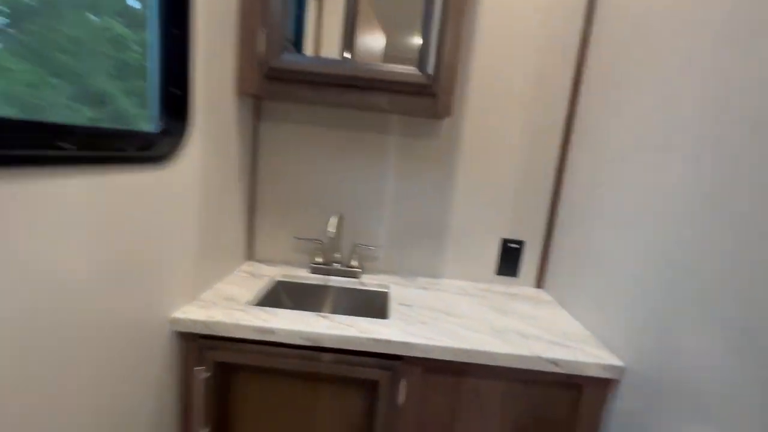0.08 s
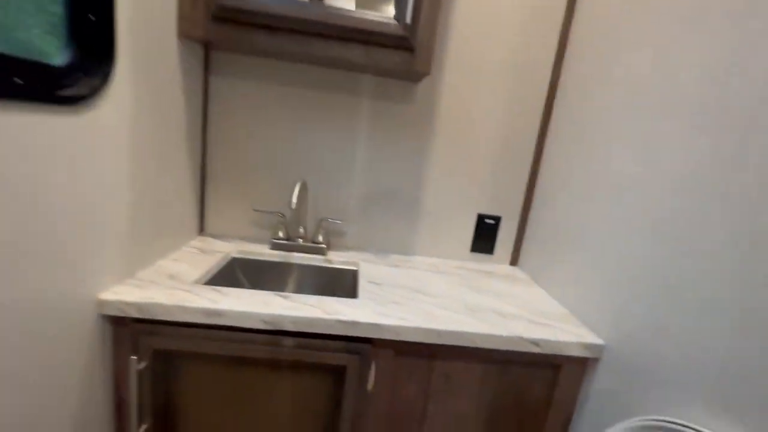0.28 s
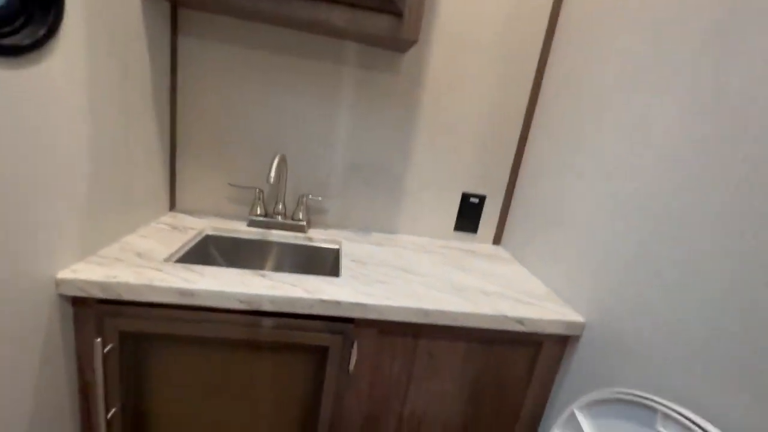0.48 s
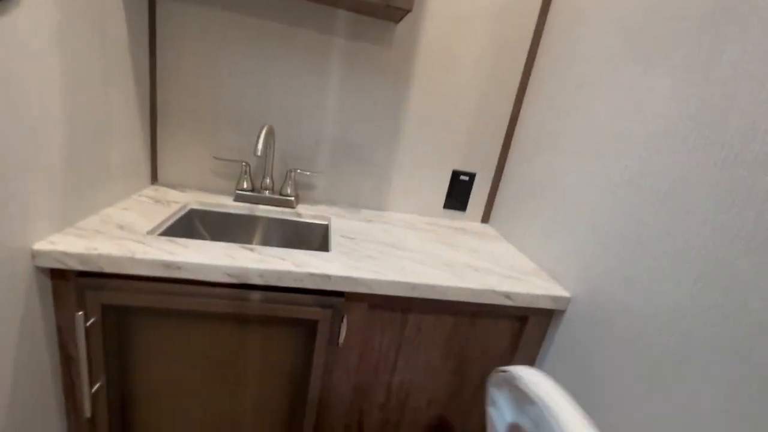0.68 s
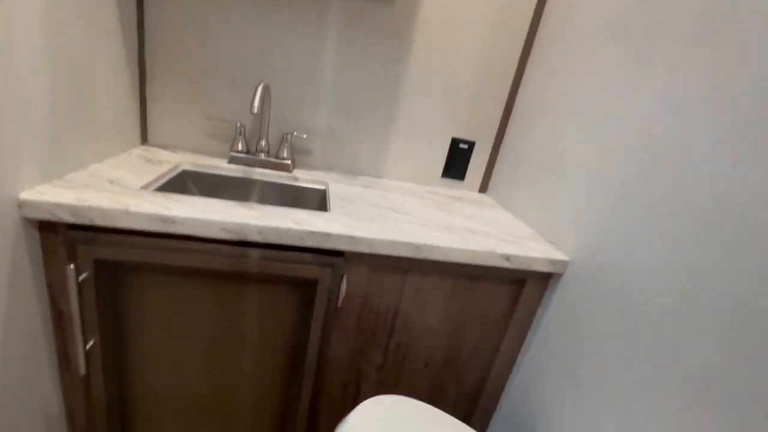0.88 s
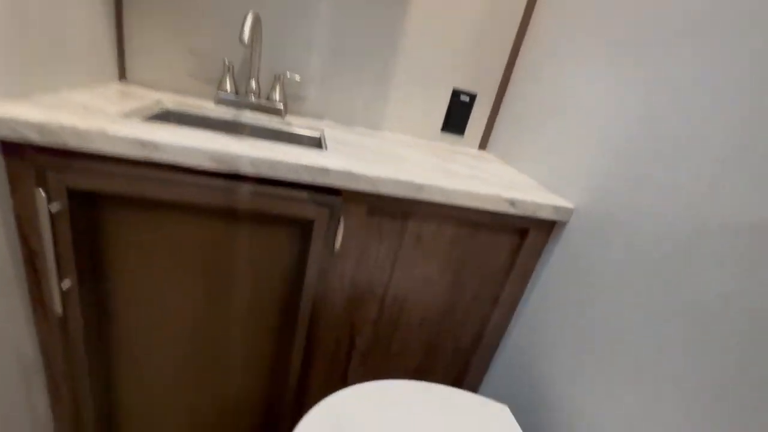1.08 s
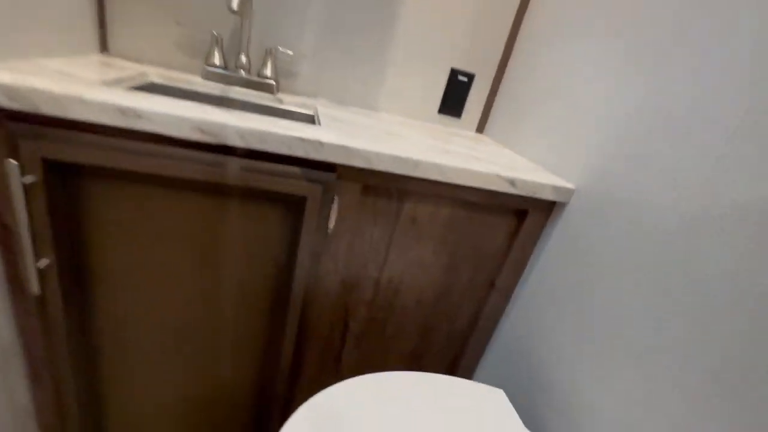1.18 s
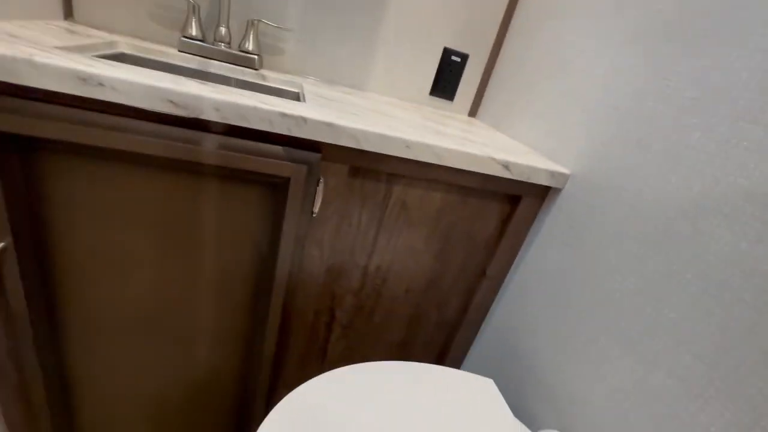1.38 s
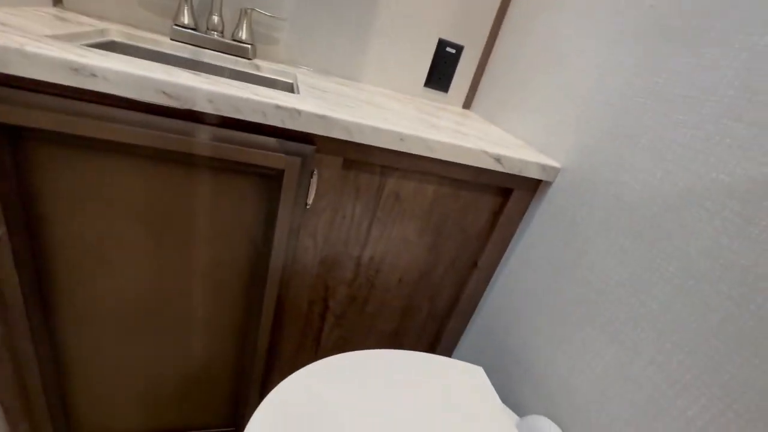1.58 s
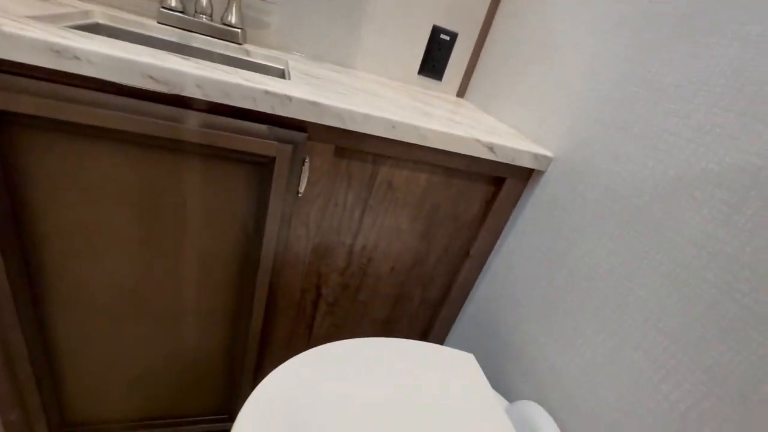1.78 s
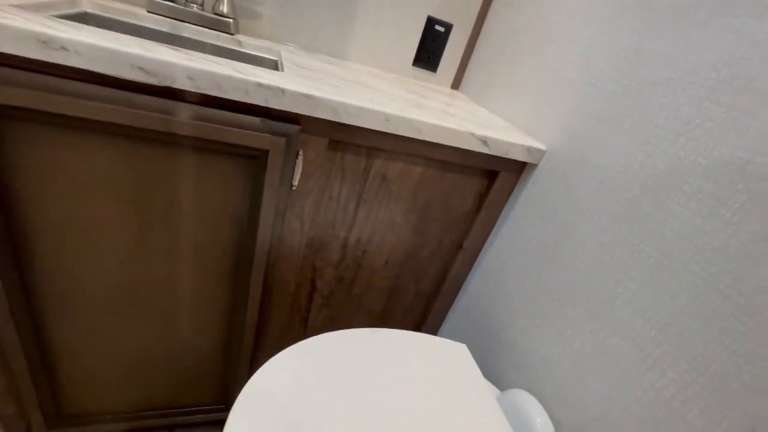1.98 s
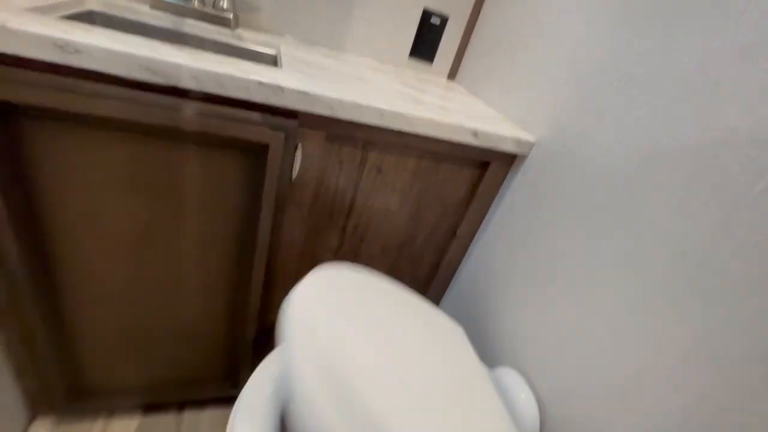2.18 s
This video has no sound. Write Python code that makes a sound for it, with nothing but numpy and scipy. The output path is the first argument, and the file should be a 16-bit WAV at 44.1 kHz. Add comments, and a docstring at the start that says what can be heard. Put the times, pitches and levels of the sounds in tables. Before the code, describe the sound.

A plastic toilet lid is moved close by in a small bathroom. A dull finger bump hits the microphone at 0.2 seconds, amid faint cloth rustle. The lid ticks and scuffs on its hinge around 0.7 to 0.8 seconds, ticks softly at 1.2, then clacks sharply on the seat at 1.6 and 1.9, each with a short room tail. Low handling rumble and faint hiss run underneath.

```python
"""Faint air hiss, cloth rustle and a lumpy grip rumble come first, on a hand-held stereo recorder in a
small panelled bathroom. Close by, a plastic toilet lid is moved: it ticks, scuffs on its hinge and
clacks twice on the seat. Each contact is a blow and a brief rattle that ring the plastic, and the walls
answer with a short tail. Right at the microphones, fingers bump and tick on the housing."""
import sys
import numpy as np
from scipy import signal
from scipy.fft import rfft, irfft
from scipy.io import wavfile

SR = 44100
rng = np.random.default_rng(int(sys.argv[2]) if len(sys.argv) > 2 else 0)


def dump_mix(stems):
    """Bounce the given channels to the path in sys.argv[1] as a 16-bit WAV at rate SR."""
    frames = np.atleast_2d(stems).T  # one column per channel
    limited = np.clip(frames, -1, 1)  # hard clip at full scale
    pcm = np.round(limited * 32767).astype(np.int16)
    wavfile.write(sys.argv[1], SR, pcm)


N = 99225

# Spectrum of the air hiss: f/Hz, level/dB
AIR_SPECTRUM = [(240, -15), (400, -5.5), (593, -2.5), (680, -11.5), (854, -3.5), (964, 3), (1120, -4),
                (1390, -1.5), (1940, 0), (3010, -19.5), (4390, -11.5), (4740, -23), (8430, -20),
                (10100, -48.5), (15000, -48)]
# Where the hiss sits (every pan is left over right): f/Hz, pan/dB
AIR_PAN = [(400, 4.5), (1300, 6.5), (2400, 12.5), (4400, 2), (8000, 13.5), (15000, 5)]
# Swells of the cloth rustle: t/s, level/dB
CLOTH_LEVEL = [(0, -59), (.06, -64), (.12, -77), (.14, -55), (.22, -53), (.26, -70), (.45, -86), (.55, -65),
               (.66, -58), (.75, -56), (.8, -56), (.87, -55), (.92, -55), (.97, -62), (1.08, -58.5),
               (1.15, -94), (1.5, -69), (2.25, -65.5)]
# Spectrum of the cloth: f/Hz, level/dB
CLOTH_SPECTRUM = [(500, 15), (1500, 23), (3000, 11), (6000, 14.5), (9000, 7), (10500, -14), (14000, -0.5),
                  (16000, -40)]
# Swells of the grip rumble: t/s, level/dB, pan/dB
GRIP_LEVEL = [(0, -52.5, 12), (.16, -35.5, 6), (.28, -41.5, 3), (.33, -45.5, 7), (.55, -40, 1),
              (.62, -52.5, 13), (.77, -46, 11.5), (.85, -42, 5), (.9, -53.5, 9.5), (1.06, -48, 8.5),
              (1.15, -46, 8), (1.26, -34, 1), (1.33, -47, 13.5), (1.55, -37.5, -3), (1.6, -39, 4),
              (1.7, -47.5, 3), (1.87, -42.5, 10), (2.04, -41.5, 8.5), (2.14, -49.5, 12), (2.25, -43.5, 13)]
# Spectrum of the grip rumble: f/Hz, level/dB
GRIP_SPECTRUM = [(18, -35), (30, -5), (71, -1), (238, -24), (265, -25), (280, -39), (400, -50), (520, -80),
                 (880, -120)]
# Band centres for the lid's contacts and the room's tail: f/Hz
BANDS_HZ = [120, 270, 420, 750, 1150, 1550, 2300, 3600, 4600, 6200, 8500, 12500]
# Contacts of the lid: t/s, level/dB, rise/s, rattle decay/s, pan/dB, then each band's relative level/dB
LID_CONTACTS = [(0.125, -35, 0.00091, 0.06, 1.5, -20, -11.5, -11, -8.5, -26, -19.5, -24, -33, -63, -24.5, -31.5, -29),
                (0.325, -31.5, 0.0029, 0.0074, -2.5, -15.5, -41, -33, -27, -40, -5, -13, 0, -12, -11.5, -29, -41),
                (0.549, -42, 0.0025, 0.029, -6.5, -4, -30, -25, -12, -9, -11, -12.5, -20, -32, -21.5, -41, -43),
                (0.623, -34.5, 0.003, 0.0067, 2.5, -30, -7.5, -6, -8, -3.5, -36, -23, -18.5, -39, -36, -48, -39),
                (0.662, -20.5, 0.0013, 0.0067, 5.5, -24.5, -33.5, -12, -26, -30, -25, -21, -22.5, -23.5, -27, -37, -41),
                (0.772, -23, 0.0028, 0.015, -1.5, -30, -29, -37, -17.5, -8.5, -8, -6, -7.5, -16.5, -15, -25, -53),
                (0.798, -25.5, 0.0023, 0.0085, 1, -22, -38, -23, -18, -50, -1, -9, -22, -31, -26, -29, -47),
                (0.897, -42.5, 0.002, 0.06, 0, -7, -17, -31, -34, -29, -17, -14, -19, -19.5, -17, -24, -23),
                (1.146, -38.5, 0.0019, 0.033, 6, -15, -2, -46, -18, -18, -26, -29, -34, -40, -26, -47, -53),
                (1.205, -31, 0.00069, 0.034, 2.5, -20, -5, -14, -12.5, -22.5, -22.5, -23.5, -30.5, -36, -29, -43, -40),
                (1.322, -47, 0.0017, 0.025, 2.5, 0.5, -3, -29, -15, -32, -26, -18, -25, -19, -14.5, -33, -43),
                (1.567, -10.5, 0.00088, 0.013, -1, -22.5, -17, -24.5, -23, -7, -13, -7.5, -6, -12, -7.5, -24, -26),
                (1.581, -13, 0.0023, 0.018, 1.5, -19.5, -33, -25, -13, -15, -10, -19, -18, -19.5, -44, -32, -49),
                (1.796, -52.5, 0.0024, 0.014, 7, 2.5, -3, -25.5, -32.5, -17, -35, -26, -23, -30, -22, -39, -54),
                (1.934, -13.5, 0.0018, 0.019, 0, -26.5, -21.5, -23.5, -22.5, -16.5, -17.5, -13.5, -16.5, -19, -20, -36, -45),
                (1.966, -23.5, 0.00183, 0.0077, -4, -24.5, -22, -21.5, -21.5, -11, -9.5, -36, -16, -32, -31, -40, -64)]
# Weight of a contact's rattle, band by band: gain/1
RATTLE_GAIN = np.array([0.9, 0.52, 0.22, 0.54, 0.84, 0.72, 0.45, 0.65, 0.89, 0.52, 0.97, 0.3])[:, None, None]
# Height of a contact's first blow, strongest in the lows, band by band: gain/1
BLOW_GAIN = np.array([30, 30, 25, 12, 9, 4, 0, 0, 0, 0, 0, 0])[:, None, None]
# Resonances of the plastic lid: f/Hz, level/dB, T60/s
LID_MODES = [(250, -2, .1), (295, -2, .08), (410, -2, .08), (781, -3, .2), (1018, -2, .1), (1135, 3, .07),
             (1190, 4, .08), (1520, 1.5, .06), (2245, -3, .05), (3413, -3, .04), (3710, .5, .05),
             (4576, .5, .05), (5362, -4, .035), (6100, -5, .03)]
# Decay of the bathroom: f/Hz, T60/s
ROOM_DECAY = [(100, 0.25), (300, 0.12), (600, 0.16), (1000, 0.21), (4000, 0.26), (12000, 0.24)]
# Finger bumps on the housing: t/s, level/dB, contact time constant/ms, pan/dB
FINGER_BUMPS = [(.201, -24, .7, 8), (.2078, .3, .78, 9.5), (.378, -32, .8, 7), (.462, -31, 1.5, -2),
                (1.076, -30, .7, 9), (1.568, -22, 1.1, 3), (1.866, -28, 1.1, 9), (2.03, -30, 1.1, 10)]
# Fingertip ticks on the housing: t/s, level/dB, f/Hz, pan/dB
FINGER_TICKS = [(.2085, -23, 800, 0.5), (.375, -43, 718, 6), (.511, -39.5, 705, 10.5),
                (1.076, -39.5, 810, 6.5), (1.858, -32, 867, 8.5), (2.024, -33.5, 840, 11),
                (2.201, -49, 750, 13)]
# Phase lag of the right channel from the recorder's stereo processing: f/Hz, lag/rad
RIGHT_CHANNEL_LAG = [(40, 1.53), (100, 1.43), (220, 1.89), (350, 2.68), (600, 4.54), (1000, 3.98),
                     (1600, 4.15), (4000, 4.99), (12000, 5.54)]

TIME = np.arange(N) / SR
FREQS_HZ = np.maximum(np.arange(N // 2 + 1) * SR / N, 1)


def amp(db):
    """Decibels to amplitude."""
    return 10 ** (np.asarray(db, float) / 20)


def unit_rms(x):
    """Scales a signal to rms 1."""
    return x / np.sqrt(np.mean(x ** 2) + 1e-20)


def over_time(rows, column=1):
    """Follows a table column from sample to sample."""
    rows = np.array(rows)
    return np.interp(TIME, rows[:, 0], rows[:, column])


def at_hz(rows, hz):
    """Reads a table along a log frequency axis."""
    rows = np.array(rows)
    return np.interp(np.log(hz), np.log(rows[:, 0]), rows[:, 1])


def filtered(x, response):
    """Applies a response given at FREQS_HZ."""
    return irfft(rfft(x) * response, N)


def coloured(x, spectrum):
    """Shapes a signal with a spectrum table; rms 1."""
    return unit_rms(filtered(x, amp(at_hz(spectrum, FREQS_HZ))))


def pan(db):
    """Left and right gains, db apart."""
    return amp(np.multiply([[.5], [-.5]], db))


def band(x, hz, width=0.18):
    """A steep band-pass; unit noise stays near rms 1."""
    sos = signal.butter(2, [hz * (1 - width), hz * (1 + width)], "band", fs=SR, output="sos")
    return signal.sosfilt(np.vstack([sos, sos]), x) / np.sqrt(3 * width * hz / SR)


def grains(per_s, shape):
    """Random clicks of uneven size; rms 1."""
    return unit_rms((rng.random(shape) < per_s / SR) * rng.standard_normal(shape))


def air_hiss(coherence=0.52, gain_db=-57):
    """Steady air noise, partly shared by the two microphones and louder on the left."""
    shared, left, right = rng.standard_normal((3, N))
    noise = np.sqrt(coherence) * shared + np.sqrt(1 - coherence) * np.array([left, right])
    return amp(gain_db) * filtered(coloured(noise, AIR_SPECTRUM), pan(at_hz(AIR_PAN, FREQS_HZ)))


def cloth_rustle():
    """Cloth rubs in swells of dense, tiny clicks."""
    return amp(over_time(CLOTH_LEVEL)) * coloured(grains(per_s=9000, shape=(2, N)), CLOTH_SPECTRUM)


def grip_rumble():
    """The hand on the recorder makes small, dull lumps, partly alike in both channels."""
    left, other = grains(per_s=220, shape=(2, N))
    rumble = coloured(np.array([left, 0.62 * left + 0.86 * other]), GRIP_SPECTRUM)
    return amp(over_time(GRIP_LEVEL)) * pan(over_time(GRIP_LEVEL, column=2)) * rumble


def lid_contacts():
    """Each contact of the lid is a blow and a dying rattle of tiny touches, with its own colour."""
    touches = grains(per_s=6700, shape=N)
    drive = np.zeros((len(BANDS_HZ), 2, N))
    for start, db, rise, decay, pan_db, *band_db in LID_CONTACTS:
        age = np.maximum(TIME - start, 0)
        rattle = touches * (1 - np.exp(-age / rise)) ** 2 * np.exp(-age / decay)
        blow = np.arange(N) == int(start * SR)
        force = RATTLE_GAIN * rattle + BLOW_GAIN * blow
        drive += amp(db + np.array(band_db))[:, None, None] * pan(pan_db) * force
    return sum(band(force + 1e-18, hz) for force, hz in zip(drive, BANDS_HZ))


def plastic_lid(contacts, crack_db=1, ring_db=-21):
    """The contacts reach the microphones as a bare crack and through the lid's damped modes."""
    ring = 0
    for k, (hz, db, t60) in enumerate(LID_MODES):
        radius, angle = amp(-60 / (t60 * SR)), 2 * np.pi * hz / SR
        mode = signal.lfilter([0, np.sin(angle)], [1, -2 * radius * np.cos(angle), radius ** 2], contacts)
        ring += (-1) ** k * amp(db) * np.sqrt(1 - radius) * mode
    return amp(crack_db) * contacts + amp(ring_db) * ring


def bathroom(x, onset_s=0.0015):
    """Dense reflections off near panels: a tail that dies band by band, its own at each microphone."""
    t = np.arange(SR // 2) / SR
    noise = rng.standard_normal((2, 2, len(t)))
    tail = 0
    for k, hz in enumerate(BANDS_HZ):
        tail += band(noise[k % 2], hz) * np.sqrt(hz) * amp(-60 * t / at_hz(ROOM_DECAY, hz))
    tail *= np.minimum(t / onset_s, 1)
    return signal.fftconvolve(x, tail / np.sqrt(np.sum(tail ** 2) / 2), axes=1)[:, :N]


def fingers(tick_half_width_cycles=0.59, low_cut_hz=75):
    """Fingers give the housing smooth pushes and short pitched ticks; the deepest lows are cut."""
    taps = 0
    for when, db, contact_ms, pan_db in FINGER_BUMPS:
        offset = np.abs(TIME - when) * 1000 / contact_ms
        taps += amp(db) * pan(pan_db) * (1 + offset) * np.exp(-offset)
    for when, db, hz, pan_db in FINGER_TICKS:
        cycles = (TIME - when) * hz
        envelope = np.exp(-(cycles / tick_half_width_cycles) ** 2)
        taps += amp(db) * pan(pan_db) * np.cos(2 * np.pi * cycles) * envelope
    return filtered(taps, 1 / np.sqrt(1 + (low_cut_hz / FREQS_HZ) ** 8))


def housing(x, delay_cycles=2.6, knee_hz=50):
    """The recorder's housing delays the lows, so a push falls in pitch."""
    return filtered(x, np.exp(-2j * np.pi * delay_cycles * np.log(FREQS_HZ + knee_hz)))


def scene(room_db=-3.5):
    """At the recorder: the lid and its reflections, with handling, air and cloth heard dry."""
    lid = plastic_lid(lid_contacts())
    reflections = amp(room_db) * bathroom(lid)
    handling = housing(grip_rumble() + fingers())
    return lid + reflections + handling + air_hiss() + cloth_rustle()


def record(dry, stopband_hz=15950):
    """The recorder's stereo processing shifts the right channel's phase for width; the top is cut."""
    lag = np.array([[0], [1]]) * at_hz(RIGHT_CHANNEL_LAG, FREQS_HZ)
    low_pass = signal.cheby2(12, 70, stopband_hz, fs=SR, output="sos")
    return signal.sosfilt(low_pass, filtered(dry, np.exp(-1j * lag)))


dry = scene()
out = record(dry)
dump_mix(out)
```